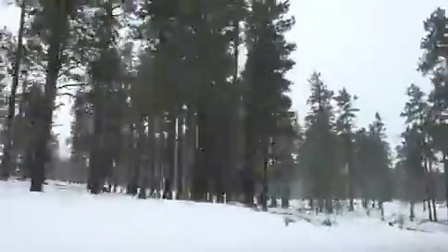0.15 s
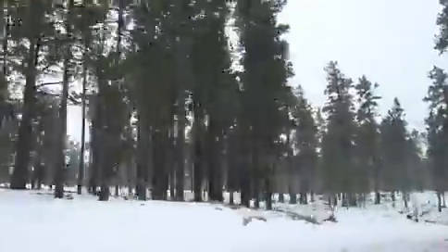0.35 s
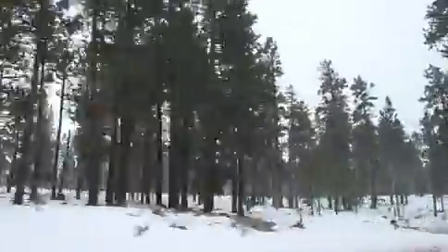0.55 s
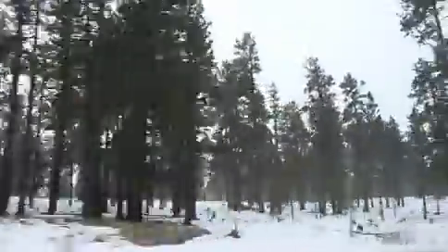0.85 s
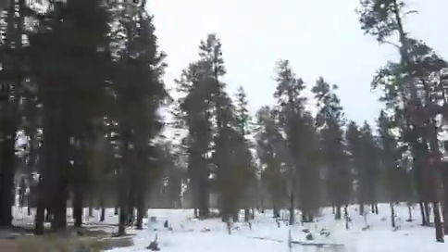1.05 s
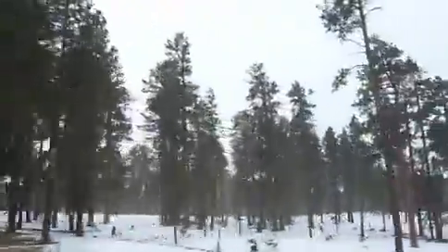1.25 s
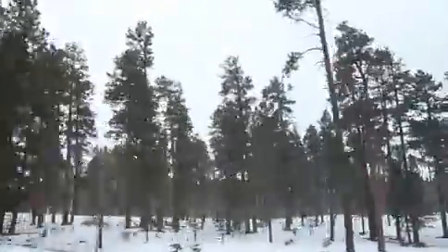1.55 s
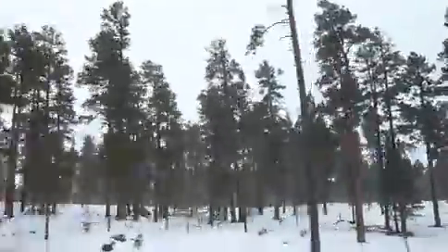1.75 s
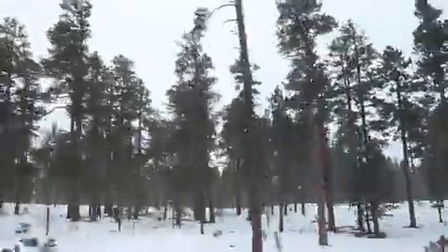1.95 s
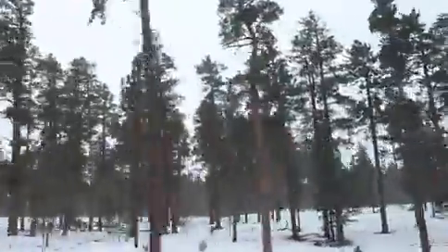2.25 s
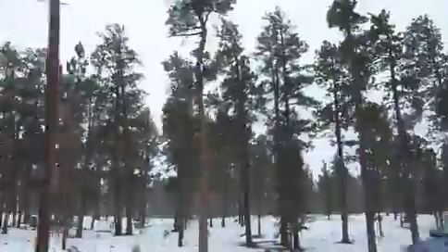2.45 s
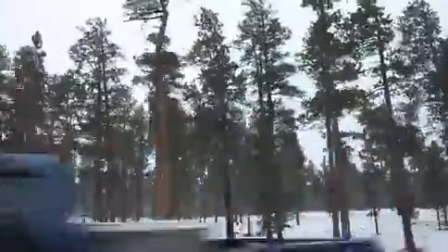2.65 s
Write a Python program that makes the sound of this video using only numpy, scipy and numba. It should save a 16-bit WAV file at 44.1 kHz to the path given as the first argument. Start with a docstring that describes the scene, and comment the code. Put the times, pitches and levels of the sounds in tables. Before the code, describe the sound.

Loud low wind rumble with crackling flutter and dull thumps, heard from a car moving past snowy woods

```python
"""Wind from the open window of a moving car buffets the two ports of a small stereo camera microphone.
From the start, noise in octave bands makes a steady low roar, and random eddies break up its treble.
Short puffs of gain make it crackle: small ones throughout, strong ones from 0.07 s, sparser after 1.7 s.
Low thumps push both ports now and then, from 0.09 s to 2.7 s.
The camera forms sum and difference of the ports, widens the treble, rides the gain and cuts the top."""
import sys
import numpy as np
from scipy import signal
from scipy.fft import rfft, irfft
from scipy.io import wavfile
from scipy.ndimage import uniform_filter1d, minimum_filter1d
from numba import njit

SR = 44100
rng = np.random.default_rng(int(sys.argv[2]) if len(sys.argv) > 2 else 0)


def voltage_ratio(level):
    """Linear amplitude factor for a level in decibels (scalar or array-like)."""
    return 10 ** (np.asarray(level, float) / 20)


def pcm_store(signal):
    """Save signal as 16-bit PCM."""
    levels = np.round(np.clip(np.atleast_2d(signal), -1, 1) * 32767)
    wavfile.write(sys.argv[1], SR, levels.astype(np.int16).T)


N = 123479  # length in samples

# How the wind changes, before the gain is ridden: t/s, relative roar level/dB,
# treble tilt/dB (its mean is removed, then each band takes its share)
WIND_COURSE = [(0, -18.5, -2), (.2, -18.5, 3.5), (.4, -16, -3), (.6, -17.5, 4), (.8, -16.5, 4.5),
               (1., -19, 3.5), (1.2, -18.5, -0.5), (1.4, -15.5, -1), (1.6, -17, -2), (1.8, -17.5, -4.5),
               (2., -17, 0.5), (2.2, -16, -3.5), (2.4, -18, -4), (2.6, -15.5, 0), (2.8, -17, -4)]
# Random eddies from slow to quick: changes per second/Hz, then spreads of level:
# shared by both ports/dB, at one port/dB (bands take a share of these two), in one band/dB (not for the quickest)
EDDY_SPEEDS = [(12.256, 2, 0.33, 1.5), (45.32, 1, -0.1, 0.5), (159.4, 2, 0, 1.04), (596.35, 3.5, 3.5, .3)]
# How the ports differ: f/Hz, right above left/dB (before sum and difference), delay of the difference/rad
PORT_BALANCE = [(40, -6.5, .6), (125, 4.5, 0.73), (248, 3.5, .6), (507, 5.5, 0.85), (1020, 0.5, 0.69),
                (3000, 0.2, 0.24), (8000, -0.5, .1)]


def on_hz(table, hz, axis=1):
    """Read a column of a table on a log-frequency axis."""
    table = np.array(table, float)
    table_hz = np.maximum(table[:, 0], 1)
    return np.interp(np.log(np.maximum(hz, 1)), np.log(table_hz), table[:, axis])


def walk(rate):
    """Random levels, each held for 1 / rate seconds, then smoothed twice; spread about 1."""
    hold = max(int(SR / rate), 2)
    steps = np.repeat(rng.standard_normal(N // hold + 3), hold)
    smooth = uniform_filter1d(uniform_filter1d(steps, hold), hold)[:N]
    return smooth / 0.75


def roar(hz, eddy_db, sharp_gain):
    """Turbulence as octave bands of noise; eddies break up the high bands more than the low ones."""
    # f/Hz, share of the eddy level swing (0-1), gain of the sharp eddies/dB
    band_response = [(40, 0.3, -25.5), (125, 0.13, -18), (248, 0.46, -14), (487, 0.56, -12.5),
                     (1000, 0.7, -6), (2540, 1, 2.6), (8000, 0.76, -1)]
    noise = rfft(rng.standard_normal(N))
    octave = np.clip(np.log2(np.maximum(hz, 1)), 5, 14)
    out = 0
    for k in range(5, 15):  # bands centred on 2 ** k Hz
        window = np.cos(np.pi / 2 * np.clip(octave - k, -1, 1)) ** 2
        band = irfft(noise * window, N)
        steady = voltage_ratio(on_hz(band_response, 2. ** k) * eddy_db)
        sharp = sharp_gain * voltage_ratio(on_hz(band_response, 2. ** k, axis=2))
        own_db = sum(db * walk(rate) for rate, _, _, db in EDDY_SPEEDS[:3])
        gain = np.hypot(steady, sharp) * voltage_ratio(own_db)
        out = out + band * gain / np.sqrt(np.mean(gain ** 2))
    return out


def puff(ms, length_ms):
    """Shape of one sharp eddy: quick rise, exponential fall."""
    rise_ms = 1.18
    after_peak = ms - rise_ms
    rise = (2 * after_peak / rise_ms) ** 2
    fall = after_peak / max(length_ms, .3)
    return np.exp(-np.where(after_peak < 0, rise, fall))


def small_eddies(t, side, ticks):
    """Gain of many small sharp eddies: puffs at random moments, sizes and sides."""
    base_db, scatter_db, pan_db, length_ms = -2, 2.5, 6.5, .6  # pan is scaled by side
    moment, size, place = ticks
    level_db = base_db - scatter_db * np.log(1 - size)  # a few are much stronger
    train = np.zeros(N)
    train[(moment * N).astype(int)] = voltage_ratio(level_db + side * pan_db * (2 * place - 0.5))
    return signal.fftconvolve(train, puff(t[:1024] * 1000, length_ms))[:N]


def strong_eddies(t, side):
    """Gain of the strongest eddies, each one puff that may favour one port."""
    # t/s, treble peak level/dB (on the scale of plain_db), lean to the left/dB (scaled by side), length/ms
    strongest = [(0.0743, -25, -0.5, 6), (0.11, -27.5, 0, 5), (0.153, -29.5, -0.5, 4),
                 (0.2051, -23.5, 5, 4), (0.2524, -23.5, 3, 3), (0.2692, -24, -0.5, 4),
                 (0.326, -25.5, -10.5, 4), (0.3619, -25.5, -6.5, 5.4), (0.4161, -26.5, 1, 4),
                 (0.44, -25, 0.5, 5), (0.4883, -28, -3, 3), (0.5197, -20.5, -5, 5.5),
                 (0.5496, -28, -2, 2.7), (0.6439, -24.5, 4.5, 3), (0.6727, -29, 2.5, 3),
                 (0.7143, -31.5, -9, 3), (0.7436, -25.5, -3, 4), (0.7814, -32, 0, 2.3),
                 (0.8490, -23.5, 4, 3), (0.8805, -31, 3, 1.5), (0.8966, -27, 0.5, 6), (0.911, -25, 0.5, 4),
                 (0.9251, -19.5, 8.5, 5.7), (0.9309, -19, 8.5, 7), (0.986, -25, -4.5, 4),
                 (1.0085, -28.5, 8.5, 2.5), (1.0360, -25.5, -5.5, 4), (1.117, -25.5, 4, 6),
                 (1.1466, -26, 1, 5), (1.158, -30, 3, 2), (1.2113, -27.5, -0.5, 3), (1.2717, -26.5, 2, 3.1),
                 (1.3288, -17.5, -8.5, 1.5), (1.3568, -26, 1, 3), (1.376, -29, 1.5, 1.2),
                 (1.4270, -24.5, 2.5, 4), (1.488, -27, -0.5, 3.7), (1.5276, -24.5, -2.5, 3.8),
                 (1.5626, -25, -5.5, 3), (1.6197, -28.5, 0.5, 4), (1.6406, -23.5, -10.5, 4.3),
                 (1.6771, -31.5, -0.5, 2), (1.8057, -31.5, -3.5, 3), (1.8985, -30.5, 0, 2),
                 (2.1294, -34, -8, 2.5), (2.2104, -26, -0.5, 1.5), (2.2388, -19.5, 4, 2.5),
                 (2.3238, -30.5, 0, 3), (2.3368, -15, -1.5, 1.2), (2.3393, -24, -0.5, 1),
                 (2.369, -23.5, -2, 2.8), (2.514, -29.5, -3, 2.3), (2.6172, -34.5, -4.5, 3),
                 (2.6671, -29, 0.5, 2), (2.7184, -33, -0.5, 3), (2.7375, -21, 3, 2.3)]
    plain_db = -36.5  # treble level of plain wind
    out = np.zeros(N)
    for start, db, pan_db, length_ms in strongest:
        gain = voltage_ratio(db - plain_db + side * pan_db / 2)
        out += gain * puff((t - start) * 1000, length_ms)
    return out


def low_thumps(hz):
    """Spectrum of larger eddies: each pushes the port with one low thump."""
    # t/s, relative strength/dB
    pushes = [(0.085, 27), (0.676, 29), (1.095, 27), (1.778, 28), (2.001, 29), (2.023, 28.5), (2.131, 29),
              (2.2400, 29.5), (2.297, 27.5), (2.502, 28.5), (2.690, 27)]
    centre_hz, spread_octaves = 430, 1.1
    pulses = sum(voltage_ratio(db) * np.exp(-2j * np.pi * hz * start) for start, db in pushes)
    octaves_away = np.log2(np.maximum(hz, 1) / centre_hz)
    return 1j * pulses * np.exp(-(octaves_away / spread_octaves) ** 2)


def port(t, hz, shared_db, ticks, side):
    """Spectrum at one port: shared and own eddies shape the roar, and thumps are added."""
    grain = 0.61  # how much the quickest eddies roughen the sharp ones
    own_db = np.array([own * walk(rate) for rate, _, own, _ in EDDY_SPEEDS])
    eddy_db = shared_db + own_db
    sharp_gain = np.abs(small_eddies(t, side, ticks) + strong_eddies(t, side))
    sharp_gain = sharp_gain * voltage_ratio(grain * eddy_db[-1])
    tilt_db = np.interp(t, *np.array(WIND_COURSE)[:, ::2].T)
    eddy_db = eddy_db.sum(axis=0) + tilt_db - tilt_db.mean()
    return rfft(roar(hz, eddy_db, sharp_gain)) + low_thumps(hz)


def uneven_ports(left, right, hz):
    """The ports are unequally exposed: tilt their balance in each band, keeping the power."""
    lean = voltage_ratio(on_hz(PORT_BALANCE, hz) / 2)
    norm = np.sqrt(lean ** 2 + lean ** -2)
    return left / lean / norm, right * lean / norm


def sum_and_difference(left, right, hz):
    """The camera colours sum and difference; a stronger difference widens the treble."""
    # Colour of the sum below the top: f/Hz, relative level/dB
    sum_colour = [(12, -39), (20, -21.5), (86, -1.5), (285, -0.5), (385, -3), (544, -8), (1190, -24),
                  (5000, -48.5), (6500, -54), (11000, -120)]
    # Colour of the sum at the top: f/Hz, level/dB above top_db
    top_colour = [(5000, -0.5), (5250, -2), (5420, -14), (5600, -4.5), (5900, -2), (6600, -5.5),
                  (7400, -10.5), (8000, -21.5), (8600, -20), (9300, -25.5), (10300, -35.5), (12000, -37),
                  (15500, -44)]
    # Colour of the difference: f/Hz, extra gain over the colour of the sum/dB
    width_colour = [(25, -9), (60, -9.5), (100, -11), (170, -5), (290, -3), (500, 1.5), (850, 4.5),
                    (1440, 4.5), (2440, 5), (4150, 4.5), (7050, 1.5), (12000, 3)]
    top_db = -49
    top = on_hz(top_colour, hz) + top_db
    colour = voltage_ratio(np.where(hz < top_colour[0][0], on_hz(sum_colour, hz), top))
    total = irfft((left + right) * colour, N)
    width = voltage_ratio(on_hz(width_colour, hz))
    delay = np.exp(-1j * on_hz(PORT_BALANCE, hz, axis=2))
    apart = irfft((left - right) * colour * width * delay, N)
    return total, apart


def scene():
    """Wind at both ports goes through the camera's stereo stage and swells with the gusts."""
    ticks_per_s = 190
    t, hz = np.arange(N) / SR, np.arange(N // 2 + 1) * SR / N
    shared_db = np.array([both * walk(rate) for rate, both, _, _ in EDDY_SPEEDS])
    ticks = rng.random((3, int(ticks_per_s * N / SR)))  # moment, size and place of each small eddy
    left = port(t, hz, shared_db, ticks, side=0.53)
    right = port(t, hz, shared_db, ticks, side=-0.55)
    left, right = uneven_ports(left, right, hz)
    total, apart = sum_and_difference(left, right, hz)
    gust = voltage_ratio(np.interp(t, *np.array(WIND_COURSE)[:, :2].T))
    return np.array([total + apart, total - apart]) * gust / (total * gust).std()


@njit
def follow(x, attack, release):
    """Level follower: quick up, slow down."""
    level, out = np.mean(x), np.empty(len(x))
    for i in range(len(x)):
        level += (x[i] - level) * (attack if x[i] > level else release)
        out[i] = level
    return out


def ride_gain(x):
    """Gain control evens out the roar: the louder it gets, the more it is turned down."""
    ratio, attack_s, release_s = 1.93, 0.0019, 0.012
    level = follow(np.abs(x).mean(axis=0), 1 / (attack_s * SR), 1 / (release_s * SR))
    level = uniform_filter1d(level, size=101)
    return x * (level.mean() / level) ** (1 - 1 / ratio)


def limit_peaks(x):
    """Limiter: the gain dips smoothly around every peak above the ceiling."""
    ceiling = .9  # of full scale
    gain = np.minimum(1, ceiling / np.abs(x).max(axis=0))
    gain = minimum_filter1d(gain, size=257)
    return x * uniform_filter1d(uniform_filter1d(gain, size=129), size=129)


def roll_off(x):
    """The treble ends steeply here."""
    return signal.sosfilt(signal.butter(12, 15700, fs=SR, output="sos"), x)


def record(dry):
    """The camera rides the gain, sets the level and limits the peaks."""
    x = ride_gain(dry)
    x = x * voltage_ratio(-17.5) / x.mean(axis=0).std()  # level of the two-channel mean in dB, before limiting
    mix = limit_peaks(x)
    return roll_off(mix)


dry = scene()
out = record(dry)
pcm_store(out)
```